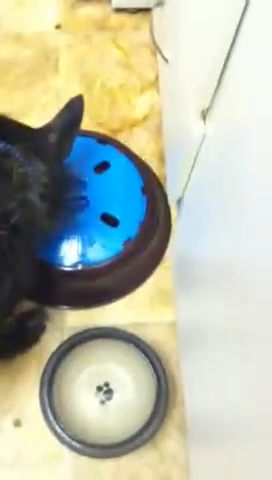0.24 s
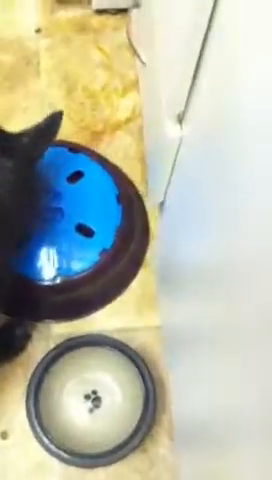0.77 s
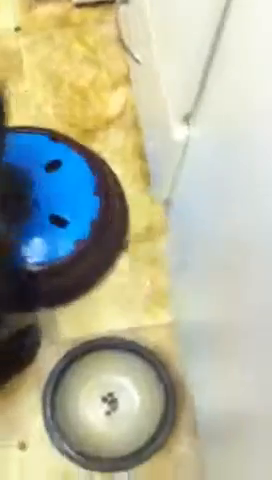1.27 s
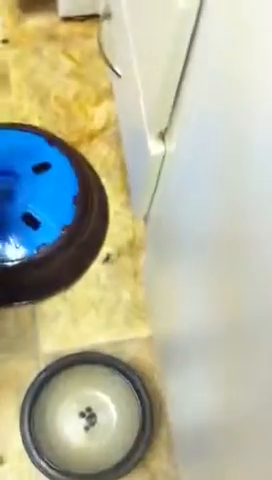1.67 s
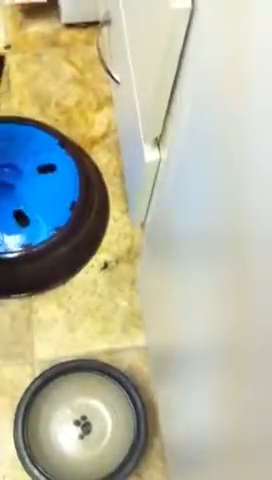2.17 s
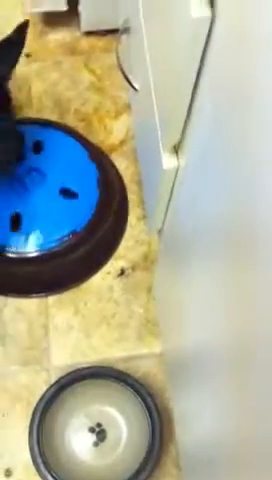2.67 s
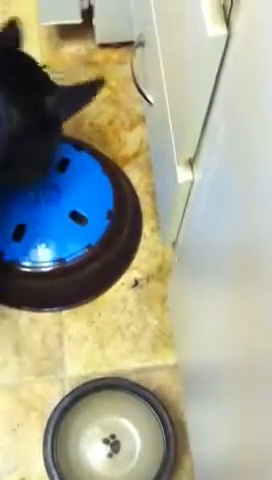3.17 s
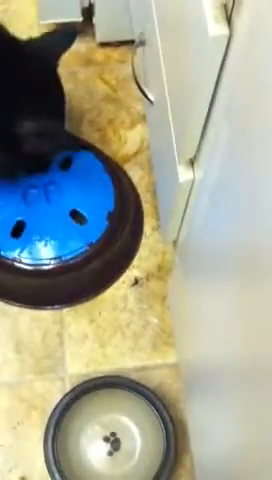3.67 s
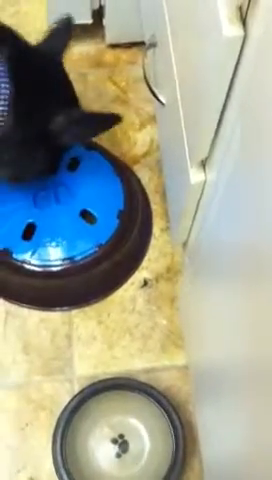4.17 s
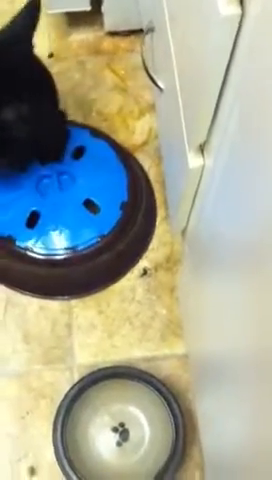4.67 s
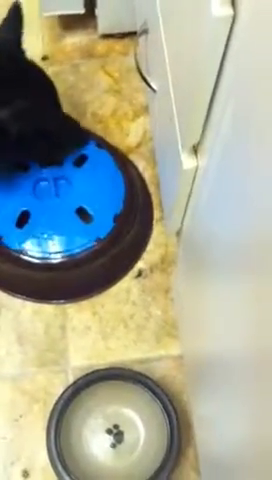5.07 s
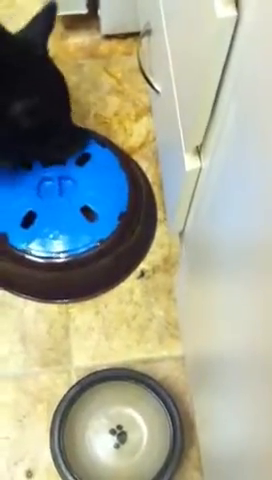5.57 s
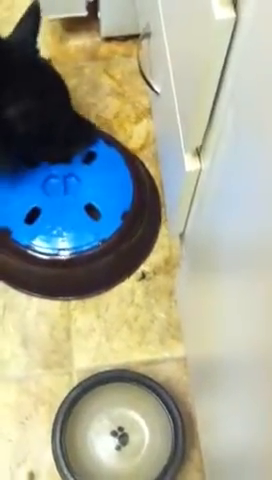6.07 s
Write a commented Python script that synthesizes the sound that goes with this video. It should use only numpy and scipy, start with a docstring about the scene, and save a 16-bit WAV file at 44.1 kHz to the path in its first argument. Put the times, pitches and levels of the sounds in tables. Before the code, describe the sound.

A quiet, steady appliance hum with soft low air noise lies under everything in a small hard kitchen, heard through a close small microphone. From 0 to 1 second only faint, high metallic ticks of a dog's collar tags are heard, strengthening near 1.3. At about 1.4 a firm hollow plastic knock and a sharp kibble crack burst out, with another crunch around 1.8. From 2 to 3.8 the tags jingle irregularly while light lid taps, short rattles and small dry crunches scatter between them. A strong boomy knock and crack land near 4.0, with bright tag clashes following. Around 4.9 comes the loudest cluster: hollow knock, hard crack and ringing tags. From 5 to 5.4 dragging, rattling and crunching are dense; after a slight easing, crisp cracks bunch at 5.9 to 6.1, and scraping and crunching continue to the end at about 6.3.

```python
"""An appliance hums steadily: filtered noise and one 120 Hz tone. From the start a dog's metal collar tags
jingle, as inharmonic modes damped while the tags touch. After about a second the dog noses a plastic puzzle
bowl on a kitchen floor: the lid knocks on its base and booms through the hollow, drags and rattles, and dry
kibble cracks between the teeth as bursts of granular noise, all busier towards the end. A small hard room
answers the bowl, the cracks and the tags with decaying diffuse noise."""
import sys
import numpy as np
from scipy import signal
from scipy.fft import rfft, irfft, next_fast_len
from scipy.io import wavfile
from scipy.ndimage import uniform_filter1d, map_coordinates

SR = 44100
rng = np.random.default_rng(int(sys.argv[2]) if len(sys.argv) > 2 else 0)


def master_out(mix):
    """Clip the mix to full scale and print it as 16-bit PCM to the path in sys.argv[1]."""
    frames = np.transpose(np.atleast_2d(mix))
    ceiling = np.clip(frames, -1, 1)
    pcm = np.round(ceiling * 32767).astype(np.int16)
    wavfile.write(sys.argv[1], SR, pcm)


N = 279153  # samples


def amp(db):
    """Level: amplitude ratio of a value in dB."""
    return 10 ** (np.asarray(db) / 20)


def unit(x):
    """Normalisation: x at rms 1."""
    return x / np.sqrt(np.mean(x ** 2) + 1e-20)


def crest(x):
    """Short-time normalisation: x with its loudest 4 ms at rms 1."""
    power = uniform_filter1d(x ** 2, size=176, mode="constant")
    return x / np.sqrt(power.max() + 1e-20)


def along(points, hz):
    """Interpolation of (f/Hz, value) points on a logarithmic frequency axis."""
    f, v = np.transpose(points)
    return np.interp(np.log(hz + 1), np.log(f + 1), v)


def add(track, s, x):
    """Superposition: mix x into the track at time s."""
    i = max(round(s * SR), 0)
    part = track[i:i + len(x)]
    part += x[:len(part)]


def coloured(x, spectrum):
    """Minimum-phase filtering: the folded cepstrum gives the spectrum a causal response."""
    m = 2 * next_fast_len(len(x))
    log_gain = np.log(amp(along(spectrum, np.fft.rfftfreq(m, 1 / SR))))
    cepstrum = irfft(log_gain)
    cepstrum[1:m // 2] *= 2
    cepstrum[m // 2 + 1:] = 0
    response = np.exp(rfft(cepstrum))
    return irfft(rfft(x, m) * response, m)[:len(x)]


def ring(modes, t, scatter_db, detune):
    """Modal superposition: damped sines, each contact exciting them at new strengths and signs."""
    hz, db, t60 = np.transpose(modes)[:, :, None]
    size, shift, sign = rng.standard_normal((3, len(modes), 1))
    envelope = amp(db + scatter_db * size - 60 * t / t60)
    tone = np.sin(2 * np.pi * hz * (1 + detune * shift) * t)
    return np.sum(np.sign(sign) * envelope * tone, axis=0)


def grit(count, spread_db):
    """Granular noise: tiny snaps of unequal size, together at rms 1."""
    return unit(rng.standard_normal(count) * amp(spread_db * rng.standard_normal(count)))


def swell(t, rise):
    """Finite contact time: smooth onset from 0 towards 1."""
    return 1 - np.exp(-(t / rise) ** 2)


def wobble(count, rate):
    """Random modulation: straight lines between random knots, rate knots a second."""
    return map_coordinates(rng.standard_normal(count), [np.arange(count) * rate / SR], order=1)


def followed(curve, column):
    """Control curve: one column interpolated at every sample."""
    rows = np.array(curve)
    return np.interp(np.arange(N) / SR, rows[:, 0], rows[:, column])


def scattered(level_db, per_s, spread_db):
    """Random point process: (t/s, level/dB) of small contacts, as strong as the motion that causes them."""
    slot = SR // 50  # at most one contact per 20 ms
    slots = np.arange(0, N - slot, slot)
    chance, place = rng.random((2, len(slots)))
    at = slots + (place * slot).astype(int)
    size_db = level_db[at] + spread_db * rng.standard_normal(len(slots))
    return np.transpose([at / SR, size_db])[chance < per_s * N / SR / len(slots)]


# spectrum of the appliance's air noise: f/Hz, relative level/dB
AIR_SPECTRUM = [(25, -28), (60, -18.5), (95, -16), (140, 0), (200, -1.5), (450, -3.5), (680, -7.5),
                (1370, -17), (2400, -25.5), (4400, -25.5), (8000, -31.5), (10000, -39), (13000, -51),
                (16000, -42)]


def appliance():
    """Stationary broadband noise with a pure 120 Hz hum."""
    t = np.arange(N) / SR
    hum = unit(np.sin(2 * np.pi * 120 * t))
    air = unit(coloured(rng.standard_normal(N), AIR_SPECTRUM))
    return amp(-50.5) * air + amp(-59.5) * hum


# decay of the room: f/Hz, t60/s
ROOM_DECAY = [(200, 0.56), (600, 0.2), (1400, 0.31), (3700, 0.29), (10000, 0.37)]


def room(x):
    """Diffuse reverberation of floor, cupboards and walls: each frequency dies at its own speed."""
    hz, t, z = signal.stft(rng.standard_normal(SR // 2), SR, nperseg=256)
    decay = amp(-60 * t / along(ROOM_DECAY, hz)[:, None])
    tail = signal.istft(z * decay, SR, nperseg=256)[1]
    tail *= swell(np.arange(len(tail)) / SR, rise=0.0022)
    return signal.fftconvolve(x, tail / np.linalg.norm(tail))[:N]


# the muzzle at work in the bowl: t/s, drive of the lid level/dB, stirred crumbs level/dB
MUZZLE_WORK = [(0, -64, -63), (.7, -66, -64), (.82, -59, -58), (1.1, -64, -65.5), (1.4, -44, -52),
               (1.65, -60, -64.5), (1.88, -43, -52), (2.2, -56, -64.5), (2.4, -44.5, -59), (2.8, -52, -65),
               (3.1, -52, -54.5), (3.3, -52, -61), (3.6, -45.5, -55.5), (3.86, -58, -65),
               (4.04, -54, -58.5), (4.81, -48, -58), (5.08, -39, -56), (5.28, -36, -48.5),
               (5.66, -44, -59.5), (5.85, -42, -62), (6.03, -36.5, -56.5), (6.33, -37, -52.5)]
# spectrum of stirred crumbs: f/Hz, relative level/dB
CRUMB_SPECTRUM = [(200, -23), (700, 14.5), (1500, 13), (2800, 12), (4800, 6), (8000, 3.5), (11000, -0.5),
                  (13000, -5), (16000, -44)]


def crumbs():
    """Granular friction: the muzzle stirs crumbs in uneven clumps."""
    stir = grit(N, spread_db=3) * amp(3.5 * wobble(N, rate=110))
    return amp(followed(MUZZLE_WORK, column=2)) * unit(coloured(stir, CRUMB_SPECTRUM))


# tags sliding on their ring: t/s, stroke level/dB, half length/s
TAG_STROKES = [(2.009, -43.5, 0.037), (3.723, -47.5, 0.054), (4.906, -43, 0.027), (5.387, -44, 0.06)]
# spectrum of metal rubbing on metal: f/Hz, relative level/dB
SCRAPE_SPECTRUM = [(2000, -21), (5000, 0), (7500, 4), (10500, 8.5), (12000, -16), (13000, -1), (16000, 5.5)]


def tag_slides():
    """Sliding friction: metal rubbing on metal gives a short, bright swish."""
    t = np.arange(N) / SR
    strokes = sum(amp(db) * np.exp(-((t - s) / half) ** 2) for s, db, half in TAG_STROKES)
    rub = grit(N, spread_db=1) * amp(3.4 * wobble(N, rate=280))
    return strokes * unit(coloured(rub, SCRAPE_SPECTRUM))


# tag clashes, before the trims below: t/s, clash level/dB, high ring level/dB, low ring level/dB,
# scrape level/dB, contact damping time/s
TAG_CLASHES = [(0.226, -52, -60.5, -49, -52, 0.11), (0.264, -40.5, -54, -52, -59, 0.11),
               (0.473, -53, -62, -70, -60, 0.054), (0.6559, -47, -63, -70, -62, 0.044),
               (0.879, -48.5, -61, -74, -67, 0.046), (1.0555, -47.5, -61, -68, -68, 0.052),
               (1.1326, -44.5, -68, -61, -53, 0.048), (1.1936, -38, -56, -48, -39, 0.078),
               (1.291, -27.5, -67, -39.5, -40, 0.036), (1.366, -48, -47, -48, -50, 0.076),
               (1.5439, -43.5, -62, -61, -43, 0.096), (1.6768, -33, -64, -56, -54, 0.054),
               (1.6984, -40.5, -54, -58, -36, 0.14), (1.8467, -37, -36, -64, -55, 0.044),
               (1.9725, -33, -47, -58, -59, 0.046), (1.9887, -27, -42, -51, -42, 0.07),
               (2.126, -34, -54, -51, -48, 0.054), (2.226, -36, -61, -46, -49, 0.066),
               (2.4633, -47.5, -67, -67, -59, 0.098), (2.713, -38, -53, -63, -42, 0.07),
               (2.729, -33, -47, -67, -47, 0.081), (2.8186, -31.5, -41, -71, -49, 0.041),
               (2.996, -28, -33, -59, -44, 0.044), (3.065, -43.5, -61, -54, -50, 0.14),
               (3.1434, -36.5, -54, -41, -50, 0.076), (3.2745, -37.5, -51, -47, -47, 0.099),
               (3.462, -41.5, -56, -55, -62, 0.07), (3.686, -40.5, -57, -58, -40, 0.11),
               (3.7698, -46, -57, -61, -51, 0.088), (3.8437, -34, -47, -64, -34.5, 0.056),
               (4.0853, -23, -43.5, -41, -48, 0.17), (4.163, -33.5, -56, -40, -48, 0.097),
               (4.186, -38, -54, -61, -44, 0.17), (4.394, -26, -61, -42, -54, 0.038),
               (4.4243, -32, -46, -59, -42, 0.11), (4.4917, -36, -43, -57, -48, 0.19),
               (4.668, -28.5, -31, -64, -60, 0.12), (4.7194, -28.5, -48, -57, -49, 0.18),
               (4.802, -39, -45, -62, -56, 0.07), (4.8269, -40.5, -54, -61, -48, 0.14),
               (4.86, -34.5, -38, -46, -51, 0.076), (4.9062, -33.5, -46, -58, -43, 0.07),
               (4.9358, -20, -38.5, -61, -46, 0.076), (5.0686, -42.5, -49, -28, -25, 0.07),
               (5.215, -28, -37, -53, -44, 0.083), (5.249, -36.5, -53, -51, -50, 0.14),
               (5.86, -38, -52, -50, -54, 0.07), (6.084, -39, -53, -46, -49, 0.19),
               (6.245, -37, -61.5, -64, -56, 0.07)]
# the tags' modes, before contact damping: f/Hz, relative level/dB, t60/s
TAG_MODES = [(4000, -14, 0.66), (5510, -10.5, 0.96), (6860, -1.5, 0.06), (8420, -12.5, 1),
             (9900, -25, 0.16), (9874, 13, 0.77), (10500, 1, 0.22), (10320, 4.5, 0.51), (10950, -6, .15),
             (11500, -3, 0.073), (11636, 2, 0.25), (13250, -9, .15), (14100, -8, 0.6), (15000, -5.5, 0.25)]
# the swinging collar: t/s, level/dB to which TOUCH_DB is added
COLLAR_SWING = [(0.0, -79), (1.11, -76), (1.29, -62), (1.74, -60), (1.92, -65), (2.57, -61.5), (2.98, -62),
                (3.4, -69), (3.7, -61), (3.93, -55.5), (4.48, -70), (4.74, -49), (4.85, -64), (5.62, -72),
                (5.99, -75), (6.33, -71)]
TOUCHES_PER_S, TOUCH_DB, TOUCH_S = 12, 15, 0.073  # light touches: rate, dB over the swing, damping time
BOUNCE_DB, FREE_RING_DB, SCRAPE_DB = -14, -21.5, -8  # second touch, lasting ring, rub of the edges


def collar_tags():
    """Modal impact of thin plates: contact damps the modes, a bounce repeats it, a faint free ring remains."""
    out, t = np.zeros(N), np.arange(SR // 3) / SR
    brief = t[:SR // 7]
    light = scattered(followed(COLLAR_SWING, column=1) + TOUCH_DB, TOUCHES_PER_S, spread_db=1.5)
    touches = [(s, db, db - 16.5, db - 12, db - 14, TOUCH_S) for s, db in light]
    for s, db, high_db, low_db, scrape_db, length in list(TAG_CLASHES) + touches:
        # relative to the usual clash
        bright_db = high_db - db + 17.5
        deep_db = low_db - db + 24.5
        rough_db = scrape_db - db + 24
        tint = [(4000, 0), (5500, deep_db), (6700, 0), (8500, rough_db),
                (9700, -.5 * bright_db), (10200, -.3 * bright_db),
                (11500, bright_db), (14000, 0.18 * bright_db + 6.5)]
        modes = [(hz, level + along(tint, hz), t60) for hz, level, t60 in TAG_MODES]
        progress = brief / max(length, .01)
        bounce_delay = rng.uniform(0.0073, 0.032)  # s
        for delay, bounce_db in [(0, 0), (bounce_delay, BOUNCE_DB)]:
            # touching damps and detunes the tags
            struck = ring(modes, brief, scatter_db=3, detune=0.00575)
            touching = crest(struck * amp(-60 * progress ** 1.44))
            rub = grit(len(brief), spread_db=2) * amp(-60 * progress)
            scrape = crest(coloured(rub, SCRAPE_SPECTRUM))
            contact = touching + amp(SCRAPE_DB + .5 * rough_db) * scrape
            add(out, s + delay, amp(db + bounce_db - 2.3) * contact * swell(brief, rise=0.00056))
        # the free ring flutters as the tags turn
        flutter = amp(4.2 * wobble(len(t), rate=110) - 60 * t / 0.6) * swell(t, rise=0.0009)
        free_ring = crest(ring(modes, t, scatter_db=6, detune=0.00076) * flutter)
        add(out, s, amp(db + FREE_RING_DB) * free_ring)
    return out


# kibble cracks and hard clicks, before trims: t/s, crack level/dB, sharp edge level/dB,
# body level/dB re the usual crunch, snap t60/s
KIBBLE_CRACKS = [(1.4252, -16.5, -31.5, 6, 0.028), (1.543, -38, -36, -14, 0.04),
                 (1.6944, -33, -42, -6.5, 0.059), (1.7749, -18, -24, -1.5, 0.044),
                 (1.8054, -28, -41, -6, 0.04), (2.5076, -41, -55, -13, 0.034),
                 (2.594, -33.5, -49, 5, 0.067), (2.9088, -41.5, -38, -6, 0.062),
                 (2.9542, -36, -42, 1, 0.034), (3.1024, -35.5, -43, -9, 0.077),
                 (3.1178, -31, -47, -7, 0.052), (3.394, -35, -75, 4, 0.04), (3.4221, -36, -64, 0, 0.059),
                 (3.5653, -32.5, -48, 1, 0.051), (3.579, -37, -57, -6, 0.043),
                 (3.5922, -28, -54, -1.5, 0.035), (3.6426, -35.5, -68, -5, 0.024),
                 (3.722, -33.5, -45, -7, 0.047), (3.7454, -32.5, -44, -21, 0.015),
                 (3.9629, -19.5, -29.5, 9, 0.065), (4.0334, -34.5, -59, 1, 0.026),
                 (4.2253, -34, -46, -22, 0.036), (4.3924, -26, -54, 0, 0.095),
                 (4.4947, -40, -56, -9, 0.043), (4.5466, -29, -53, 7, 0.07), (4.5825, -33, -57, -5, 0.049),
                 (4.7306, -30.5, -52, 2, 0.068), (4.7464, -26, -65, 3, 0.083),
                 (4.8798, -13, -30, -0.5, 0.03), (4.8984, -22.5, -44, -12, 0.058),
                 (4.9874, -23.5, -63, -7, 0.03), (4.9965, -23.5, -46, -7.5, 0.04),
                 (5.1023, -12.5, -22.5, -11, 0.046), (5.1574, -32.5, -60, 4, 0.049),
                 (5.2265, -17, -38, -7, 0.038), (5.2719, -14.5, -44, -7, 0.04),
                 (5.4266, -28.5, -46, -2, 0.044), (5.4354, -26, -60, 3, 0.036),
                 (5.5667, -31.5, -48, -3, 0.046), (5.5772, -27.5, -61, -10, 0.04),
                 (5.654, -26, -74, -7, 0.033), (5.7513, -29.5, -41, 6.5, 0.067),
                 (5.7633, -26, -48, -2.5, 0.04), (5.8634, -30.5, -41, 0.5, 0.12),
                 (5.8855, -17.5, -33, -9, 0.056), (5.8964, -20.5, -38, -15.5, 0.063),
                 (5.9104, -25, -51, -9, 0.055), (5.9454, -25.5, -61, -4, 0.046),
                 (6.0387, -26, -60, 1, 0.12), (6.0616, -16, -18, -8, 0.068), (6.0814, -28, -39, -10, 0.056),
                 (6.2008, -21.5, -36, -13, 0.04), (6.2297, -25, -51, -3, 0.034)]
# spectrum of a crunch: f/Hz, relative level/dB
CRUNCH_SPECTRUM = [(40, -88), (200, -8), (900, -2), (1500, -4.5), (1900, 4), (2200, 0), (2600, 7.5),
                   (3500, -1), (4500, 0.5), (6000, -8.5), (8500, -19.5), (11000, -32), (16000, -34)]
CHIPS_PER_S, CHIP_DB, CHIP_S = 12, 7, 0.09  # small fractures: rate, dB over the crumbs, t60
RUN_DB, RUN_T60_S = -5, 0.078  # the run of fractures under a snap


def kibble():
    """Brittle fracture: a sharp snap over a clumped run of smaller fractures; small chips break in between."""
    out, t = np.zeros(N), np.arange(SR // 10) / SR
    breaks = scattered(followed(MUZZLE_WORK, column=2) + CHIP_DB, CHIPS_PER_S, spread_db=4)
    chips = [(s, db, db - 35, -5, CHIP_S) for s, db in breaks]
    for s, db, edge_db, body_db, length in list(KIBBLE_CRACKS) + chips:
        snap = grit(len(t), spread_db=1.5) * amp(-60 * t / max(length, .004))
        fractures = grit(len(t), spread_db=4) * amp(7 * wobble(len(t), rate=240))
        run = fractures * amp(RUN_DB - 60 * t / RUN_T60_S)
        tint = [(1100, body_db + 11.5), (2200, 0), (5000, 0), (7000, edge_db - db + 23)]
        # every piece has its own colour
        spectrum = [(hz, level + along(tint, hz) + rng.normal(0, 1.8)) for hz, level in CRUNCH_SPECTRUM]
        add(out, s - .0004, amp(db - 5.0) * crest(coloured(snap + run, spectrum)))
    return out


# spectrum of the lid's rattle: f/Hz, relative level/dB
RATTLE_SPECTRUM = [(40, -42), (110, -39), (170, -9), (280, -6.5), (450, -2.5), (570, -5.5), (700, 2),
                   (950, -4.5), (1170, -8.5), (1400, -13.5), (2000, -19), (4000, -21), (12000, -56)]


def lid_drag():
    """Stick-slip friction: pushed sideways, the lid sticks and slips and stirs the hollow."""
    slips = grit(N, spread_db=4) * amp(4 * wobble(N, rate=70))
    return amp(followed(MUZZLE_WORK, column=1) - 9.5) * unit(coloured(slips, RATTLE_SPECTRUM))


# lid knocks, before trims: t/s, hollow level/dB, hollow f/Hz, thud level/dB,
# lid's lowest mode level/dB, clack level/dB
LID_BLOWS = [(1.242, -33.5, 722, -40.5, -43, -61), (1.426, -13, 709, -27, -15, -26),
             (1.522, -36, 678, -65, -39.5, -58), (1.774, -27, 718, -37, -24.5, -19),
             (1.885, -49, 690, -46, -53, -40), (2.367, -40.5, 785, -51, -49, -54),
             (2.405, -35.5, 790, -52, -32, -60), (2.531, -32.5, 723, -54, -45, -50),
             (2.596, -41.5, 836, -38, -39, -42), (2.682, -27.5, 726, -40, -29.5, -39.5),
             (2.71, -33.5, 666, -45, -45, -54), (2.902, -34.5, 684, -60, -37, -48),
             (2.921, -27.5, 693, -60, -29.5, -46), (2.957, -25, 708, -41.5, -28.5, -32.5),
             (3.059, -34, 810, -45, -50, -49), (3.119, -37.5, 840, -42.5, -41, -45),
             (3.355, -29, 704, -35, -53, -49), (3.425, -36.5, 713, -55, -55, -52),
             (3.662, -34.5, 800, -45, -57, -54), (3.78, -28, 717, -48.5, -32.5, -51),
             (3.967, -14, 691, -28.5, -27.5, -31), (4.032, -28, 813, -40, -32, -45),
             (4.074, -22.5, 678, -33.5, -37, -48), (4.143, -39, 693, -62, -56, -60),
             (4.208, -36.5, 672, -45, -45, -54), (4.349, -37, 697, -40, -52, -56),
             (4.498, -25.5, 692, -53, -36, -45), (4.524, -20.5, 707, -43, -30.5, -36.5),
             (4.578, -33, 700, -42, -42, -53), (4.84, -35.5, 815, -40.5, -50, -48),
             (4.884, -9.5, 698, -41, -26.5, -23), (4.99, -38, 735, -45, -47, -52),
             (5.064, -31, 700, -38.5, -48, -53), (5.185, -36, 676, -41.5, -52, -46),
             (5.241, -17, 682, -29.5, -55, -36), (5.275, -32, 684, -40, -45, -41),
             (5.303, -21, 720, -29, -48, -50), (5.345, -36, 696, -39, -53, -58),
             (5.429, -32.5, 740, -56, -37, -46), (5.568, -30, 702, -33, -41, -42),
             (5.751, -38, 806, -37.5, -34, -42), (5.878, -31, 684, -31.5, -40, -40),
             (6.204, -28, 682, -33.5, -26, -28), (6.293, -31.5, 685, -41.5, -58, -46)]
# modes of the base, before the thud's extra damping: f/Hz, relative level/dB, t60/s
BASE_MODES = [(172, -6.5, 0.16), (239, 0, 0.053), (379, 4.5, 0.033), (403, 2.5, 0.046), (457, 0.5, 0.47)]
# modes of the lid, lowest first: f/Hz, relative level/dB, t60/s
LID_MODES = [(928, 12, 0.042), (1194, -7, 0.085), (1350, 3.5, 0.039), (1416, 1.5, 0.066), (1800, 6, 0.018),
             (1880, -4, 0.024)]
TAPS_PER_S, TAP_DB, TAP_HZ = 4.2, -0.5, 750  # light taps: rate, dB re the lid's drive, hollow pitch


def lid_knocks():
    """Impact on a cavity: the settling lid pumps the hollow, excites both shells and rattles; taps fall between."""
    out, t = np.zeros(N), np.arange(SR // 5) / SR
    light = scattered(followed(MUZZLE_WORK, column=1) + TAP_DB, TAPS_PER_S, spread_db=0.0)
    taps = [(s, db, TAP_HZ, db - 7, db - 9, db - 10.5) for s, db in light]
    for s, db, hz, thud_db, flex_db, clack_db in list(LID_BLOWS) + taps:
        cavity = ring([(hz, 0, .026)], t, scatter_db=1, detune=0.008)
        hollow = crest(cavity * swell(t, rise=0.0072))
        base = ring(BASE_MODES, t, scatter_db=9, detune=0.065)
        thud = crest(base * swell(t, rise=0.0057) * amp(-60 * t / 0.082))
        flex = crest(ring(LID_MODES[:1], t, scatter_db=1, detune=0.031) * swell(t, rise=0.0011))
        clack = crest(ring(LID_MODES[1:], t, scatter_db=1, detune=0.012) * swell(t, rise=0.00037))
        chatter = grit(len(t), spread_db=5) * amp(5 * wobble(len(t), rate=150))
        shaken = chatter * swell(t, rise=0.0019) * amp(-60 * t / 0.13)
        rattle = crest(coloured(shaken, RATTLE_SPECTRUM))
        rattle_db = -11.0 - 0.48 * (db + 25)  # light touches mostly rattle, firm blows mostly boom
        knock = amp(db - 1.5) * hollow + amp(thud_db + 3.5) * thud
        knock += amp(flex_db - 2) * flex + amp(clack_db - 2) * clack
        knock += amp(db + rattle_db) * rattle
        add(out, s - .0022, knock)
    return out


def scene():
    """Superposition of direct sound and reverberation: bowl, food and collar close by in a small room."""
    bowl = lid_knocks() + lid_drag()
    cracks = kibble()
    tags = collar_tags() + tag_slides()
    echo = room(amp(-8.5) * bowl + amp(-11) * cracks + amp(-10.5) * tags)
    return (bowl + cracks + tags + crumbs() + echo + appliance())[None]


# response of the small microphone: f/Hz, level/dB
MIC_RESPONSE = [(20, 1.5), (85, -6), (118, -1), (11700, -5), (12700, -7.5), (15100, -18.5), (16000, -23)]


def record(dry):
    """Linear filtering: a small microphone, dull in the top octave, and a band limit at 15.9 kHz."""
    top_hz = 15900
    m = next_fast_len(N + SR // 2)
    hz = np.fft.rfftfreq(m, 1 / SR)
    response = amp(along(MIC_RESPONSE, hz)) * (hz < top_hz)
    return irfft(rfft(dry, m) * response, m)[:, :N]


dry = scene()
out = record(dry)
master_out(out)
```